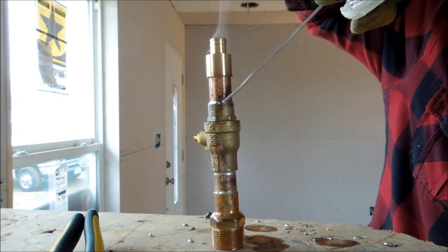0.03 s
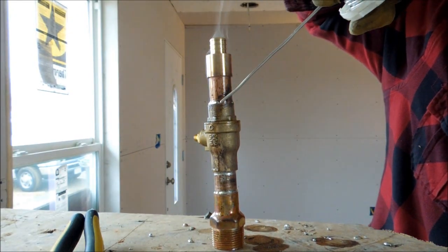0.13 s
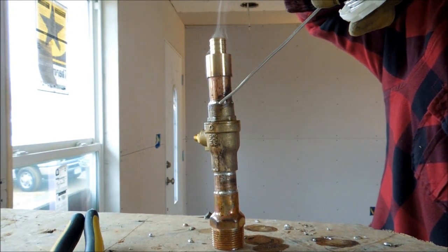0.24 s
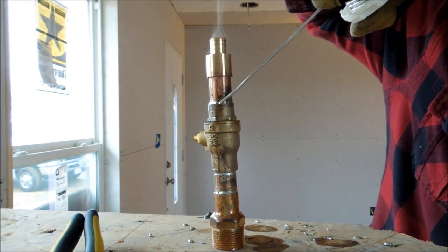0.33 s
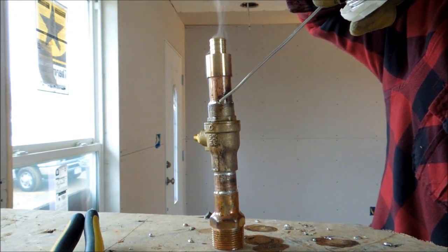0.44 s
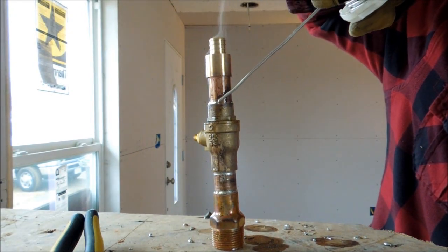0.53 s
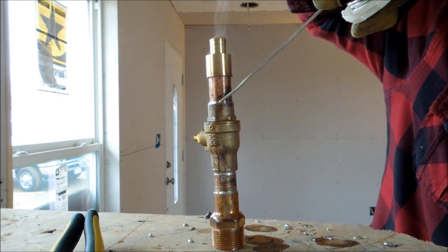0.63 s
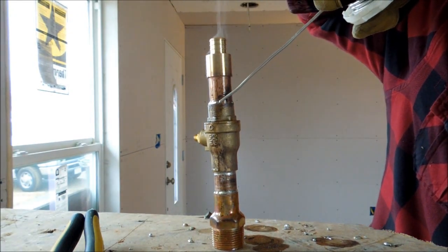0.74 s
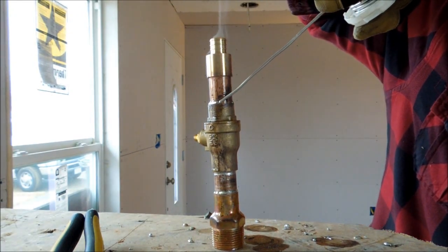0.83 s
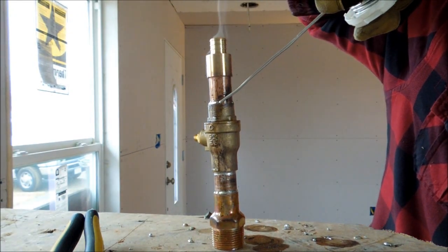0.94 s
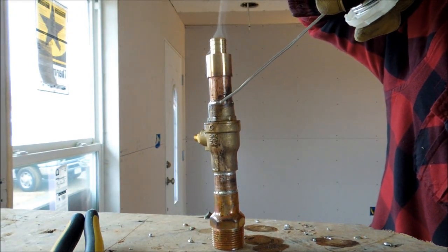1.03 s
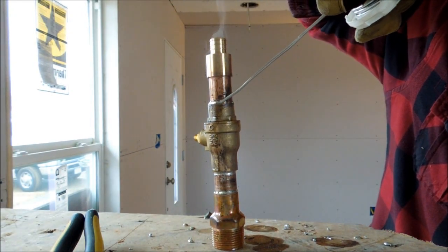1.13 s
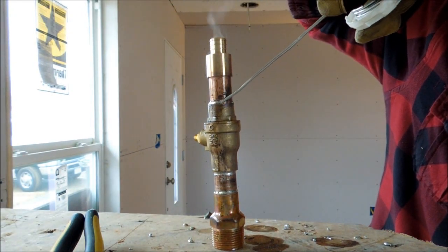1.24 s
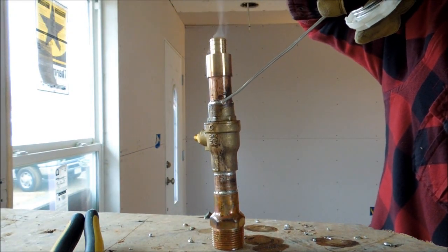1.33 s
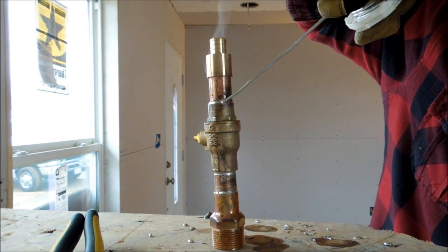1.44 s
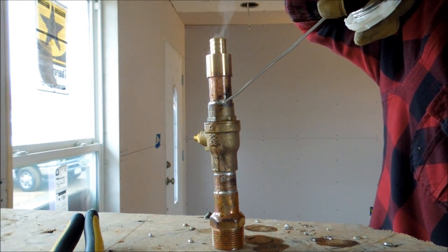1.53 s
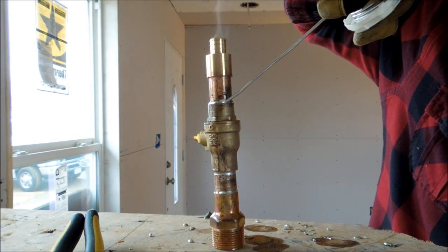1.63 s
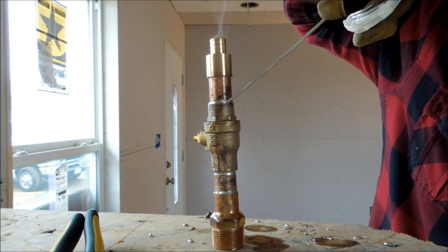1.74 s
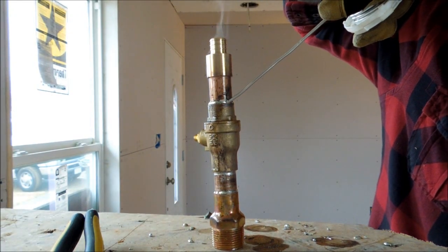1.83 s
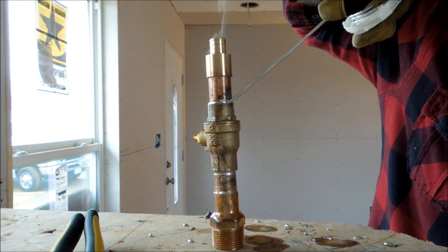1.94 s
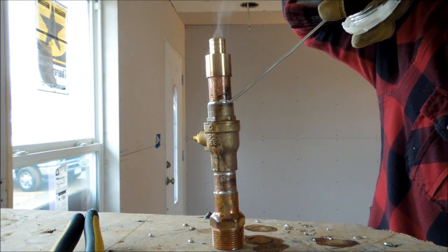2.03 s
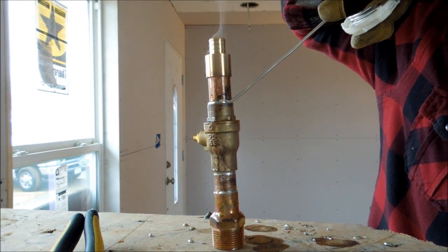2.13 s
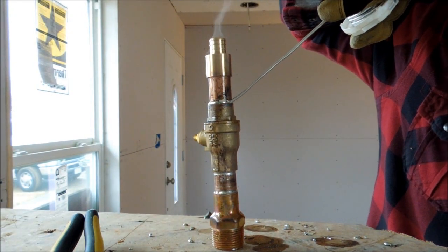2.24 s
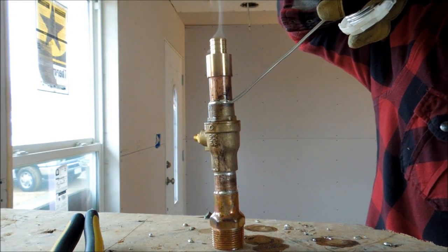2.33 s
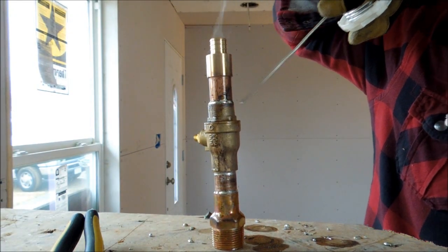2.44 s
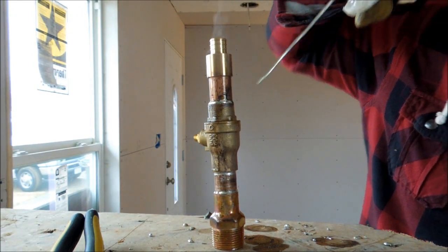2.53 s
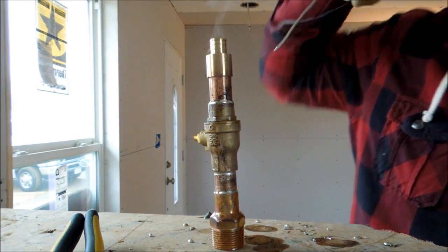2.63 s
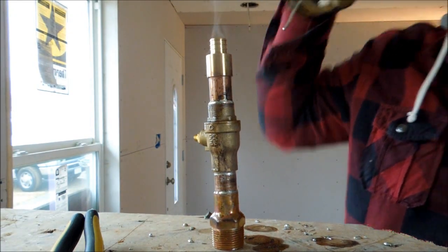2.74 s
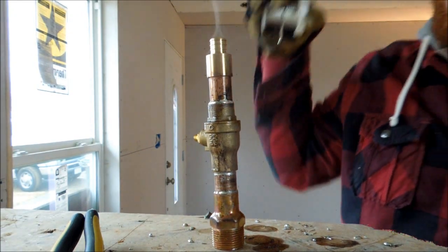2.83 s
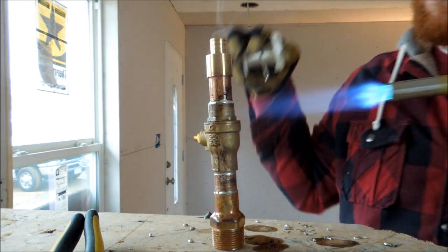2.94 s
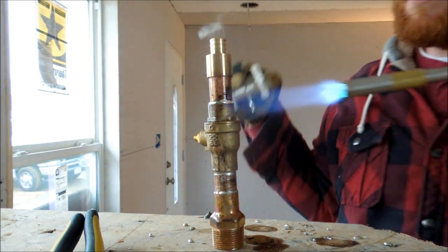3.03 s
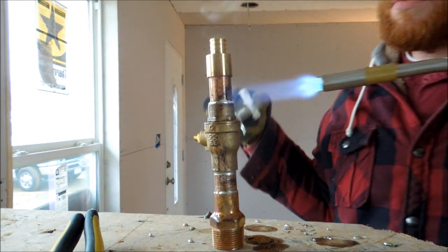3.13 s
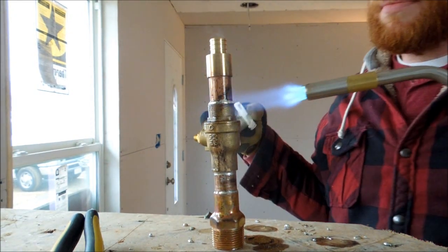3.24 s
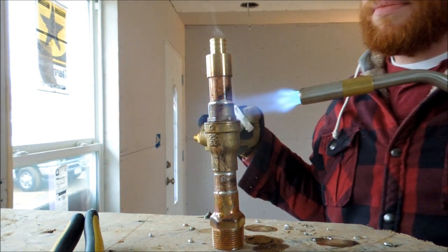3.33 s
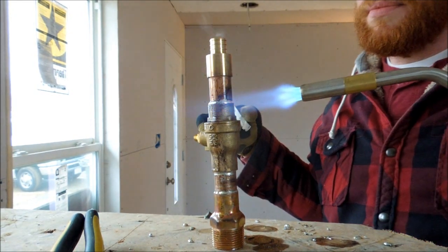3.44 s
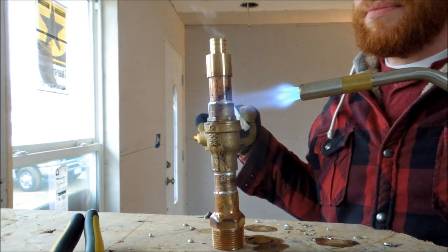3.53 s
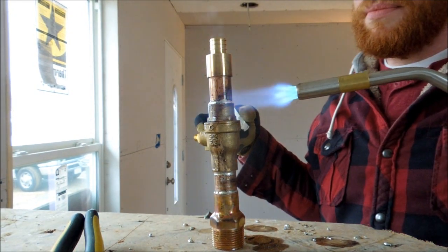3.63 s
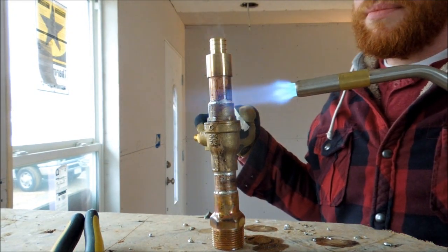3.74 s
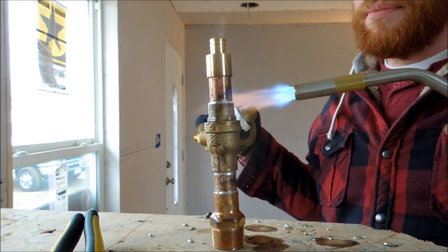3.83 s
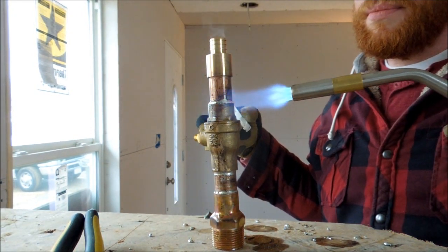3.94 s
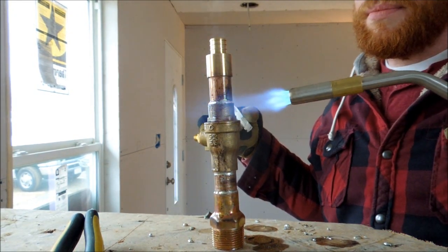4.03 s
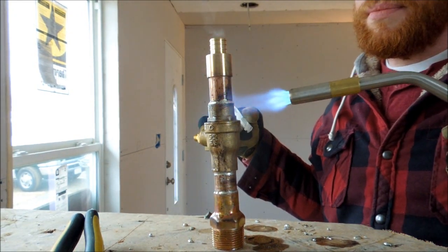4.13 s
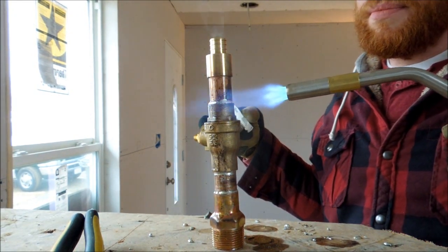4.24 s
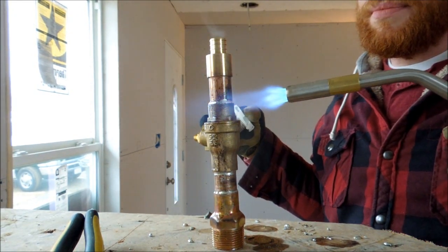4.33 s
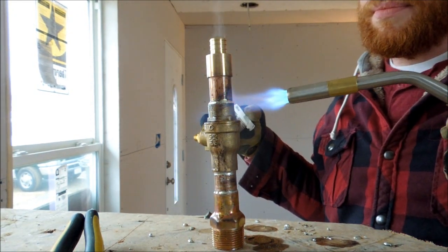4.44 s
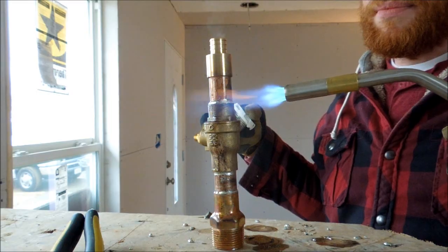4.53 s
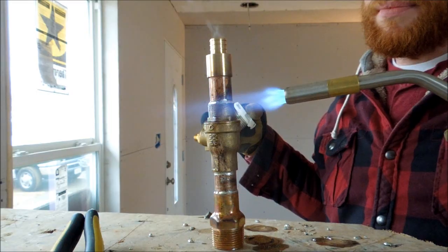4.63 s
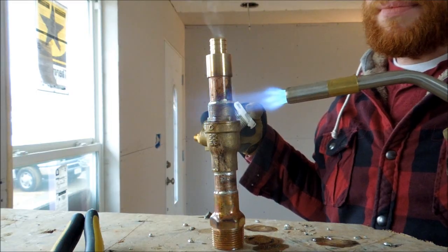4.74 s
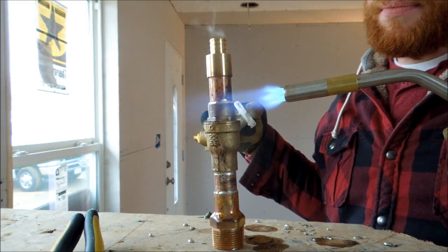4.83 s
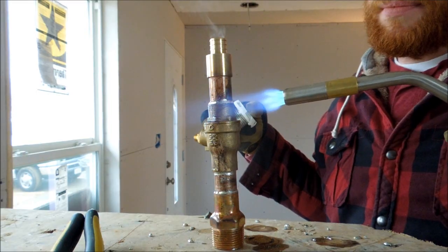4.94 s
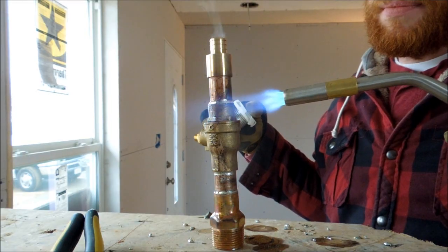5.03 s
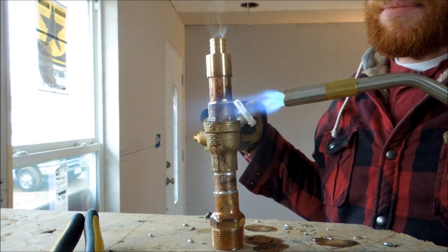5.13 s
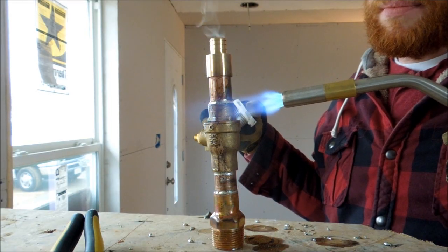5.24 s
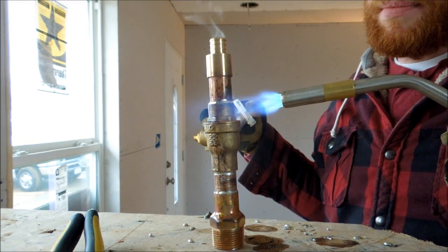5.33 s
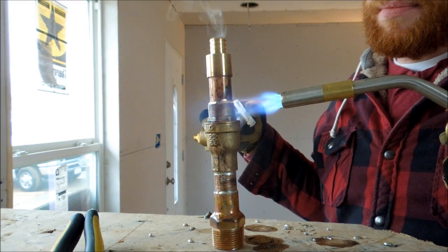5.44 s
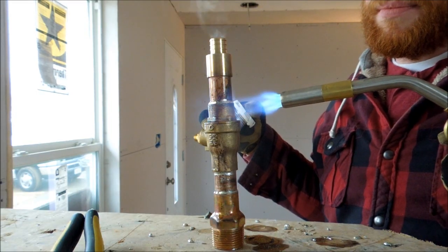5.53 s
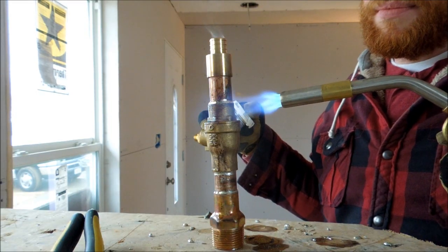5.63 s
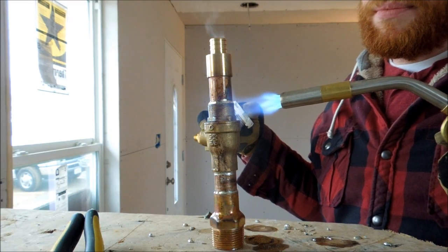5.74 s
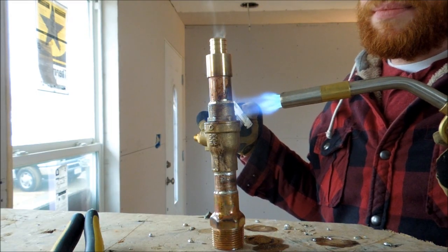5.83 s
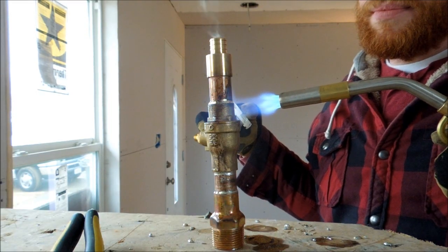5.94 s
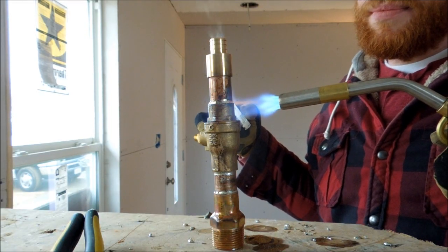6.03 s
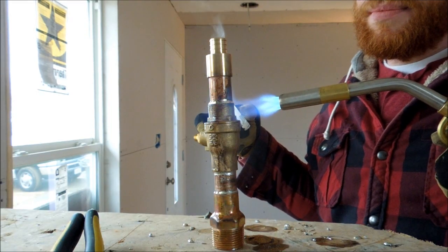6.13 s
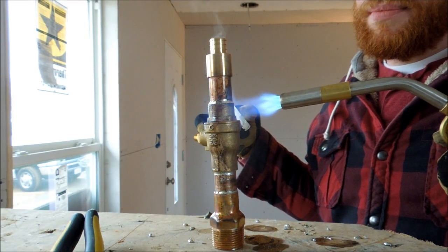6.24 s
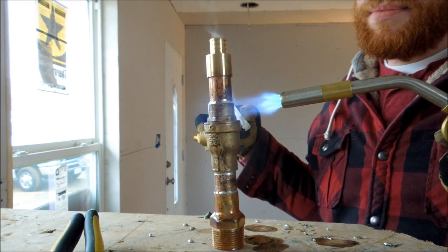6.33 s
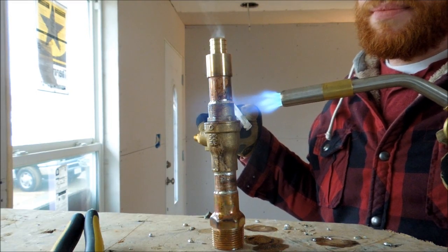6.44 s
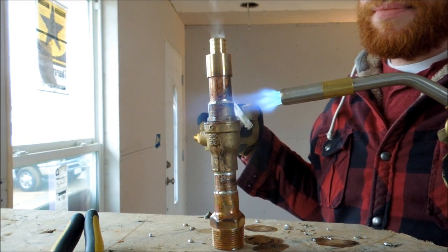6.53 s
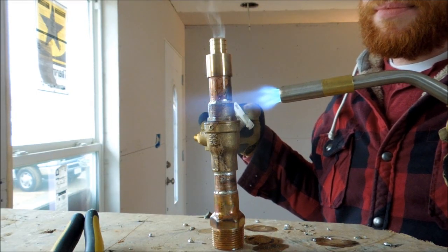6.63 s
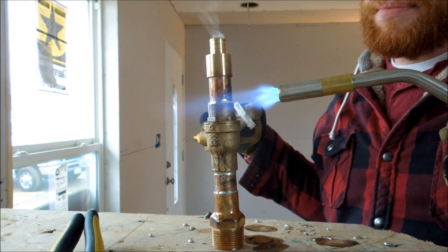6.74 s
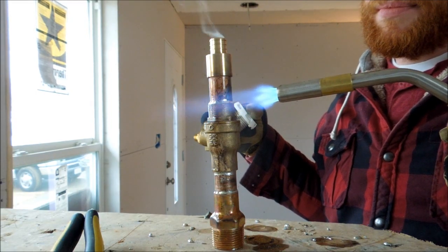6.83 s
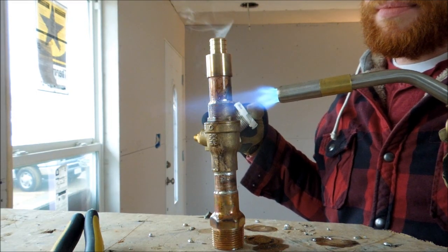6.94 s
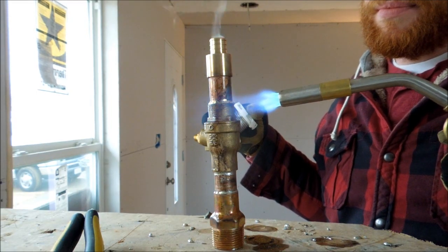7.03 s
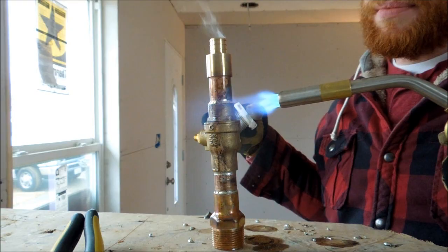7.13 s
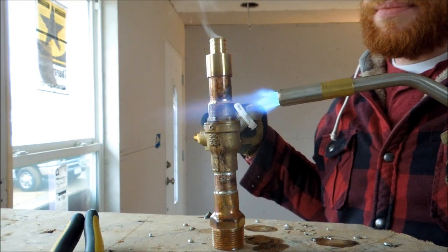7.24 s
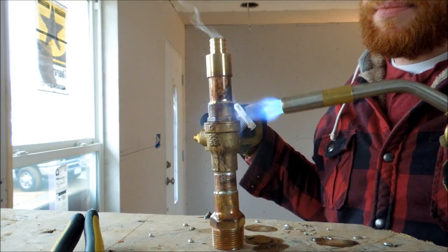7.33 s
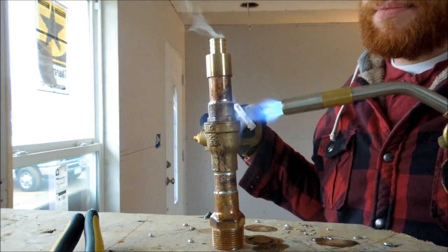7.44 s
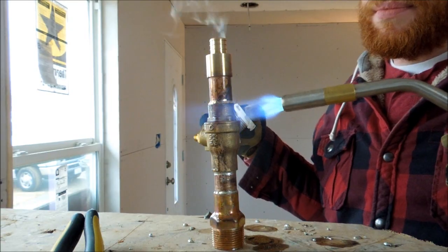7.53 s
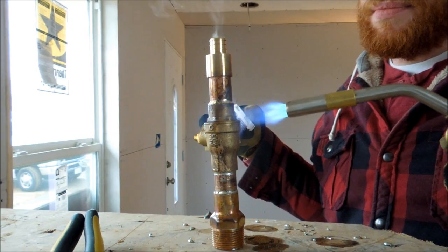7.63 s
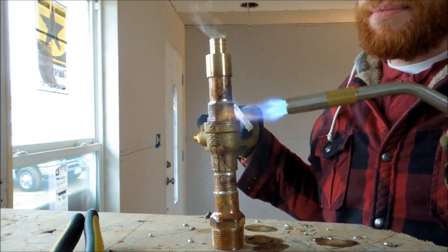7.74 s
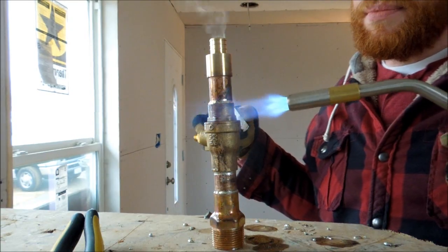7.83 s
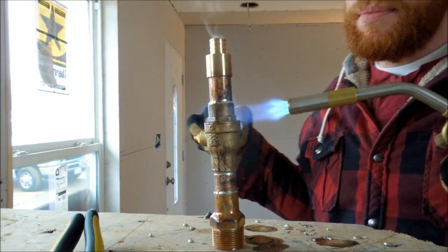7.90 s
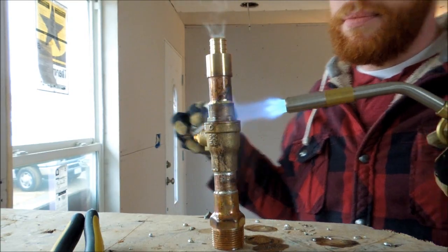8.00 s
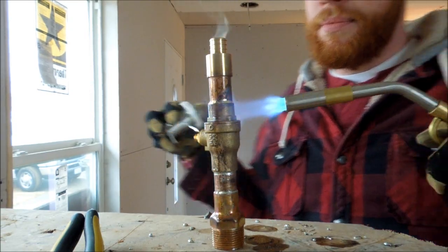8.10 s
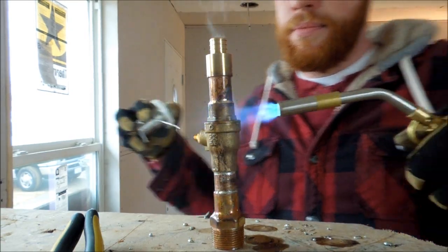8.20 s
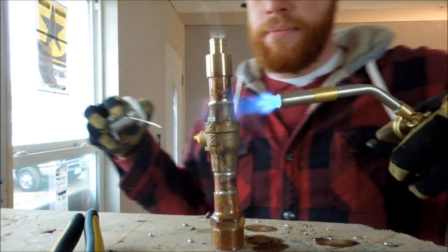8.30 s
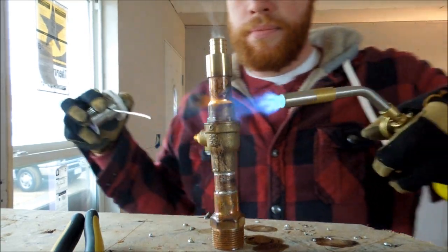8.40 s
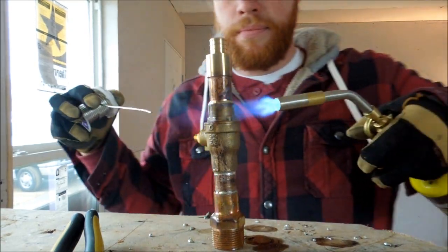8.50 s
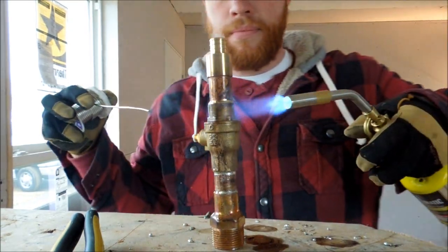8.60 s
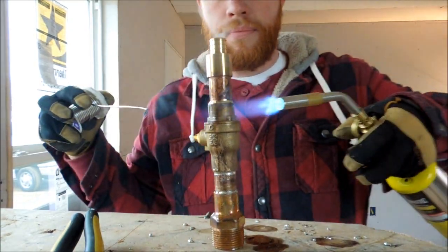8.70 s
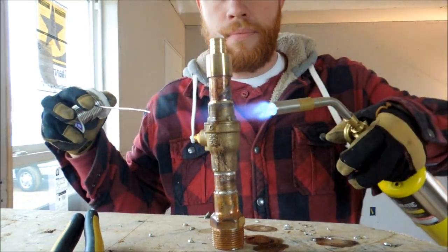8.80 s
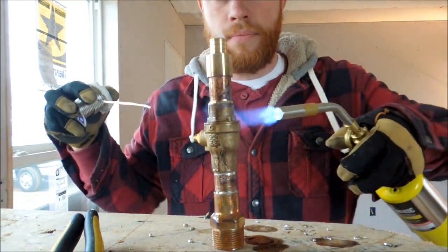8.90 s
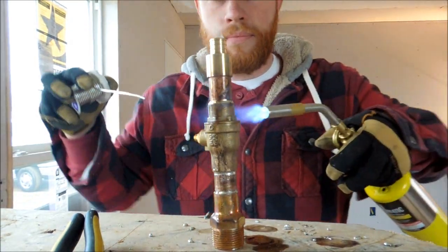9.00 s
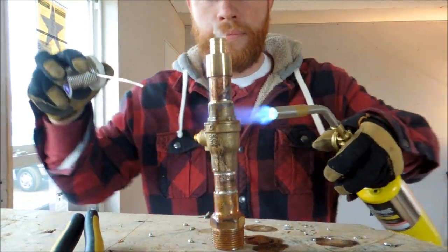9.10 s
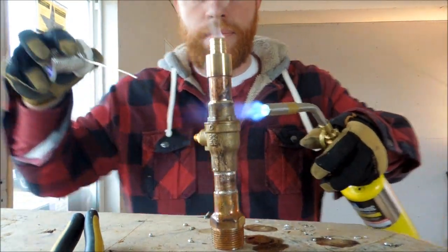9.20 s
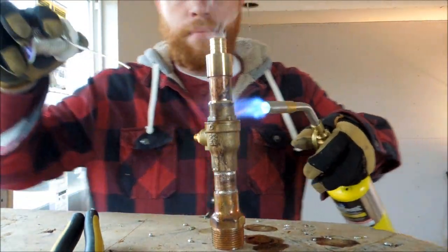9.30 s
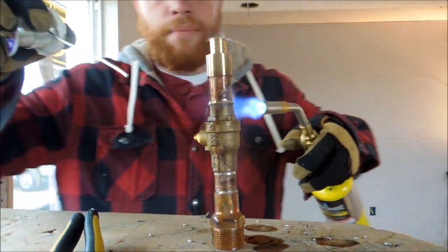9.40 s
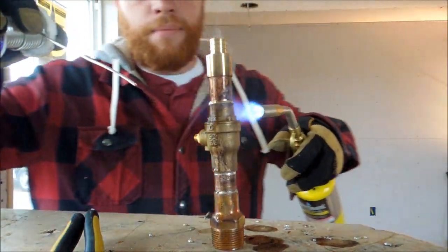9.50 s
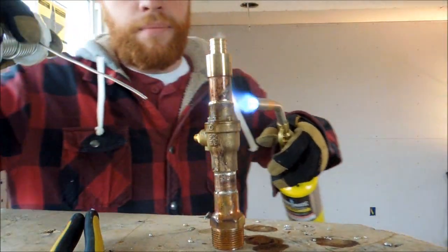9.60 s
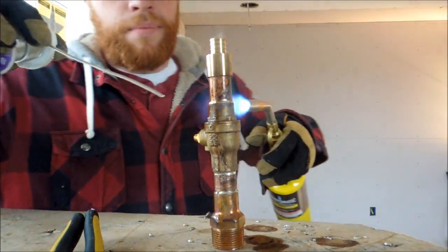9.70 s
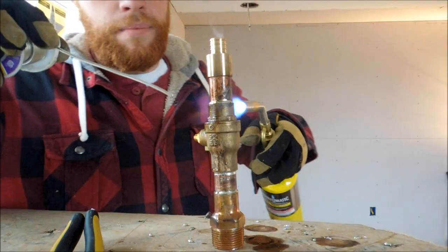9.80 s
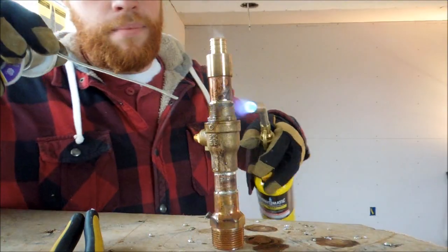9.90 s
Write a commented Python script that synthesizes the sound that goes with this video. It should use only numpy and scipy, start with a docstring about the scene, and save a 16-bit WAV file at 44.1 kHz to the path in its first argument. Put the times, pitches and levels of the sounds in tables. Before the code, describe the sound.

Flux sizzles and spits faintly on a hot pipe, then a gas torch hisses on, ignites with a whump and roars steadily.

```python
"""A workbench in a quiet room: flux sizzles and spits in a hot copper pipe joint, with small knocks.
A hand torch is opened, its gas hissing through a resonant tube; it lights with a crack and a whump.
It burns on with a loud roar that darkens as the torch swings behind the pipe. Coloured noise makes
room, gas and flame; bursts make the flux; damped sines make spits, knocks and whump."""
import sys
import numpy as np
from scipy import signal
from scipy.io import wavfile
from scipy.ndimage import uniform_filter1d

SR = 44100
rng = np.random.default_rng(int(sys.argv[2]) if len(sys.argv) > 2 else 0)


def int16_out(signal):
    """Quantize to a 16-bit WAV file."""
    q = np.round(np.clip(np.atleast_2d(signal).T, -1, 1) * 32767)
    wavfile.write(sys.argv[1], SR, q.astype(np.int16))


N = 439236

GAS_S, LIGHT_S = 2.929, 3.005  # the valve opens; the gas catches [s]
EDGE_HZ = 14210  # upper band limit
FRAME = 4096  # samples in a spectral frame
HOP = FRAME // 4
T = np.arange(N) / SR
HZ = np.fft.rfftfreq(FRAME, 1 / SR)
FRAME_S = np.arange(-(-N // HOP) + 1) * HOP / SR


def amp(db):
    """The decibel law: level to amplitude gain."""
    return 10 ** (np.asarray(db) / 20)


def evened(x):
    """Normalization to unit rms."""
    return x / np.sqrt(np.mean(x ** 2) + 1e-20)


def read(points, hz=HZ):
    """Interpolation of a spectrum on a logarithmic frequency axis."""
    f, value = np.transpose(points)
    return np.interp(np.log(hz + 1), np.log(f), value)


def follow(rows, t):
    """Linear interpolation of a table's columns at the times t."""
    s, *columns = np.transpose(rows)
    return [np.interp(t, s, c) for c in columns]


def band_level(db, lo, hi):
    """Power summation: level [dB] between lo and hi of unit noise coloured by db."""
    in_band = (HZ >= lo) & (HZ <= hi)
    return 10 * np.log10(np.mean(amp(db) ** 2 * in_band))


def add(mix, s, sound):
    """Linear superposition of a sound from time s."""
    part = mix[..., round(s * SR):][..., :sound.shape[-1]]
    part += sound[..., :part.shape[-1]]


def filtered(x, order, hz, kind):
    """Butterworth filtering: a maximally flat pass band."""
    return signal.sosfilt(signal.butter(order, hz, kind, fs=SR, output="sos"), x)


def wander(top_hz, count=24):
    """A sum of slow sines in random phase: an irregular curve of rms 1, one value per frame."""
    rates = np.geomspace(top_hz / 10, top_hz, count)
    sines = np.sin(2 * np.pi * (rates * FRAME_S[:, None] + rng.random(count)))
    return evened(sines.sum(1, keepdims=True))


def noise(db, likeness=None):
    """Partial coherence: noise coloured by db (bins, or frames x bins) at two microphones."""
    if likeness is None:
        # coherence of the microphone pair: (frequency [Hz], likeness [0-1])
        likeness = [(20, 0.85), (150, .99), (1000, 0.98), (2200, 1), (4500, 0.98), (6800, 0.96),
                    (7600, 0.89), (10000, 0.76), (11400, 0.86), (13000, .79), (14000, .58)]
    # level difference of the pair: (frequency [Hz], left minus right [dB])
    balance = [(30, 1.5), (130, -1.8), (650, -1.4), (1100, -0.4), (6800, -0.1), (7800, -0.8), (10500, -2.1),
               (13200, -1)]
    # phase difference of the pair: (frequency [Hz], phase by which left leads [rad])
    lead = [(7000, 0.011), (9500, 0.41), (14000, 0.27)]
    frames = dict(nperseg=FRAME, noverlap=FRAME - HOP)
    a, b = signal.stft(rng.standard_normal((2, N)), **frames)[2].transpose(0, 2, 1)
    same = np.clip(read(likeness), 0, 1)
    lean = amp(read(balance) / 2)
    right = (same * a + np.sqrt(1 - same ** 2) * b) * np.exp(-1j * read(lead))
    pair = np.array([a * lean, right / lean]) * amp(db)
    return signal.istft(pair.transpose(0, 2, 1), **frames)[1][:, :N]


def reflections(x, early_db, early_t60, late_db, late_t60):
    """Reverberation: decaying noise adds quick scatter off the bench and a longer room tail."""
    t = T[:SR // 2]
    early, late = amp(-60 * t / early_t60), amp(-60 * t / late_t60)
    early_part = amp(early_db) * early / np.linalg.norm(early)
    late_part = amp(late_db) * late / np.linalg.norm(late)
    scatter = noise(0)[:, SR:SR + len(t)]
    response = (early_part + late_part) * scatter
    return x + signal.oaconvolve(x[None], response, axes=1)[:, :N]


def room():
    """A diffuse field: faint hiss over a low rumble that swells and sinks."""
    # shape of the room noise: (frequency [Hz], relative density [dB per Hz])
    room_shape = [(12, -30), (20, 0), (42, 0), (60, -8), (122, -13), (217, -20), (302, -20), (346, -23),
                  (443, -24.5), (522, -26.5), (14000, -41.5)]
    # coherence of the diffuse field: (frequency [Hz], left-right likeness [0-1])
    room_likeness = [(60, 0.88), (180, 0.48), (530, 0.16), (1550, 0.15), (4600, 0.04), (13600, 0.02)]
    swell_db, swell_hz = 1.4, 4  # rms depth and fastest rate
    db = read(room_shape)
    low = 1 / (1 + (HZ / 260) ** 2)
    rumble_db = -52.3 + swell_db * wander(swell_hz) - band_level(db, 20, 200)
    hiss_db = -53 - band_level(db, 300, 14000)
    return noise(db + low * rumble_db + (1 - low) * hiss_db, room_likeness)


def flux(bubbles_per_s=6000):
    """Random impulses: tiny bubbles burst, swell a little, then drop to a faint steady simmer."""
    # level of the simmering flux: (time [s], level [dB])
    sizzle = [(0, -60), (.3, -57), (.62, -57.5), (.8, -67)]
    bursts = rng.standard_normal(N) * (rng.random(N) < bubbles_per_s / SR)
    fizz = filtered(bursts, 1, 1800, "high")
    return evened(fizz) * amp(follow(sizzle, T)[0])


def spits(spray_db=7, spray_s=0.0011):
    """Impulsive excitation: drops of boiling flux burst and ring the modes of the pipe."""
    # spits of flux: (time [s], level applied to ring and spray [dB])
    spit_times = [(0.225, -28), (0.4164, -44), (.5173, -25), (0.723, -52)]
    # modes of the pipe: (frequency [Hz], relative level [dB], t60 [s])
    pipe_modes = [(1630, -11.5, 0.017), (2930, -5.5, 0.0096), (3500, -10, .007), (5170, -7, .007),
                  (5930, -1, 0.0062), (8300, -10, .005), (10500, -10, .005), (11700, -2, 0.0054)]
    out, t = np.zeros(N), T[:SR // 10]
    for s, db in spit_times:
        ring = 0
        for hz, level, t60 in pipe_modes:
            ring = ring + amp(level - 60 * t / t60) * np.sin(2 * np.pi * (hz * t + rng.random()))
        spray = amp(spray_db) * rng.standard_normal(len(t)) * np.exp(-(t / spray_s) ** 2)
        spray = filtered(spray, 2, 8500, "high")
        onset = 1 - np.exp(-t / 0.00036)
        add(out, s, amp(db) * (ring + spray) * onset)
    return reflections(out, early_db=-6, early_t60=0.043, late_db=-9, late_t60=0.38)


def handling():
    """Damped free vibration: small knocks as the hands move."""
    # knocks: (time [s], initial level [dB], frequency [Hz], t60 [s])
    knocks = [(0.723, -47, 200, 0.16), (.724, -52, 338, .12), (2.805, -46, 3400, .02)]
    out, t = np.zeros(N), T[:SR // 4]
    for s, db, hz, t60 in knocks:
        add(out, s, amp(db - 60 * t / t60) * np.sin(2 * np.pi * hz * t))
    return reflections(out, early_db=-12, early_t60=.05, late_db=-12, late_t60=.3)


def gas(tube_hz=995, bounce=.52, rise_s=0.03, level_db=-21.5):
    """Tube resonance: flow noise is reinforced at multiples of the tube's round-trip rate."""
    # shape of the unlit gas noise: (frequency [Hz], relative density [dB per Hz])
    gas_shape = [(100, -26), (600, -19), (1000, -13.5), (1400, -19), (2000, -7), (2600, -13), (3700, -15),
                 (5000, -4.5), (8000, -3), (12400, 0), (14000, -9)]
    echo = bounce / (1 + (HZ / 11000) ** 2) * np.exp(-2j * np.pi * HZ / tube_hz)
    db = read(gas_shape) - 20 * np.log10(abs(1 - echo))
    valve = np.clip((T - GAS_S) / rise_s, 0, 1) ** 1.5
    unlit = np.exp(-np.maximum(T - LIGHT_S, 0) / 0.098)
    return noise(db - band_level(db, 200, EDGE_HZ) + level_db) * valve * unlit


def ignition(crack_db=-5, crack_s=0.006, whump_delay_s=0.00262):
    """Impulsive expansion: the flame front cracks down the tube, then the gas outside whumps."""
    # modes of the air as the gas catches: (frequency [Hz], level before onset [dB], t60 [s])
    air_modes = [(241, 9, .03), (195, 0.5, 0.11), (130, -9, 0.064), (60, -18, .1), (345, -9.5, 0.14),
                 (586, -15, 0.12), (831, -9.5, 0.15)]
    out, t = np.zeros(N), T[:SR // 3]
    crack = evened(filtered(rng.standard_normal(len(t)), 1, 3500, "high"))
    add(out, LIGHT_S, amp(crack_db) * crack * np.exp(-(t / crack_s) ** 2))
    whump = -sum(amp(db - 60 * t / t60) * np.sin(2 * np.pi * hz * t) for hz, db, t60 in air_modes)
    onset = 1 - np.exp(-t / 0.0012)
    add(out, LIGHT_S + whump_delay_s, whump * onset)
    return reflections(out, early_db=-10, early_t60=0.055, late_db=-11, late_t60=.25)


def comb_db(angle):
    """Comb interference: delayed copies stripe the flame's spectrum as the hand turns and wobbles."""
    # surfaces round the flame: (unshifted delay [ms], strength before filtering, negative = inverted)
    surface_echoes = [(1.37, .09), (1.875, -0.063), (3.47, 0.1), (4.82, -0.17), (5.815, 0.14),
                      (6.615, 0.09), (7.92, -.07)]
    wobble_ms, wobble_hz = .015, 1.2  # unsteady hand: rms shift, fastest rate
    sooner_ms_per_deg, working_deg = .0026, 8  # far echoes come sooner as the torch turns
    ceiling_ms, ceiling_gain = 4.985, .215  # before shift and treble loss
    # short-delay colouring that hollows out the flame's built-in treble stripes as the torch turns
    hollow_ms, hollow_gain, hollow_deg = .436, .29, 32
    glove_ms, glove_gain, glove_shift_ms, glove_hz = .75, .11, .09, 1  # mean delay; rms shift, rate
    phase_per_ms = -2j * np.pi * HZ / 1000

    shift_ms = wobble_ms * wander(wobble_hz) - sooner_ms_per_deg * (angle - working_deg)
    surfaces = sum(gain * np.exp(phase_per_ms * ms) for ms, gain in surface_echoes)
    surfaces = surfaces * HZ / (HZ + 600)
    ceiling = ceiling_gain * np.exp(phase_per_ms * ceiling_ms)
    treble_loss = 1 + (HZ / 11000) ** 2  # the top scatters away
    far = (surfaces + ceiling) * np.exp(phase_per_ms * shift_ms) / treble_loss

    turned = 1 - np.exp(-(angle / hollow_deg) ** 2)
    hollow = -hollow_gain * turned * HZ / (HZ + 2400) * np.exp(phase_per_ms * hollow_ms)
    glove_delay_ms = glove_ms + glove_shift_ms * wander(glove_hz)
    glove = glove_gain * HZ / (HZ + 2500) * np.exp(phase_per_ms * glove_delay_ms)
    return 20 * np.log10(abs(1 + far + hollow + glove))


def flame(flutter_db=0.56, flare_db=5.2, flare_s=.145, gust_db=.6, gust_hz=6):
    """Turbulent combustion: a low roar, a gusty rush round the pipe and the jet's directional hiss."""
    # shape of the flame noise: (frequency [Hz], relative density [dB per Hz])
    flame_shape = [(20, -38), (60, -21), (110, -8), (200, -8.5), (420, -3.5), (650, -5.5), (1050, -12),
                   (2250, -3), (3700, -13), (4600, -9), (5850, -15), (8000, -14.5), (11400, -9.5),
                   (13000, -11), (14200, -15)]
    # burner and space round the bench: (frequency [Hz], two standard deviations [Hz], lift [dB])
    resonances = [(134, 22, 7.5), (204.7, 20.5, 12.5), (247, 33, 10.5), (330, 77, 6.5), (391, 31, -7.5),
                  (569, 21, 8), (692, 78, 7.5), (857, 41, 6.5), (917, 37, 11), (1155, 22.6, 10),
                  (1190, 15, 3), (1362, 40, 7.5), (1660, 11, 4.5), (2014, 28, 4.5), (2407, 30, 2.5),
                  (2580, 39.6, -5), (2590, 76, 5.5), (2890, 31, 5.5), (3444, 37, 4.5), (4540, 77, 2.5),
                  (5760, 260, -4), (7350, 330, 2.5), (11300, 500, 3), (12500, 260, 3)]
    # the hand turns the torch from side-on to behind the pipe: (time [s], angle [degrees])
    torch_angle = [(3.25, 1), (4.0, 15), (4.2, 4), (5.4, 3), (6.8, 13), (7.95, 11), (8.3, 30), (8.53, 46),
                   (8.8, 77), (8.96, 59), (9.11, 72), (9.25, 61), (9.5, 84), (9.8, 90), (9.92, 84)]
    # how squarely the flame strikes the pipe: (time [s], contact [0-1])
    pipe_contact = [(3.3, .05), (3.6, .62), (4.2, .08), (5.3, .06), (5.7, .28), (6.2, .46), (7.05, .14),
                    (7.3, .6), (7.5, .18), (8.6, .33), (8.9, .5), (9.3, .45), (9.5, .96), (9.77, .9),
                    (9.92, .35)]
    beam_deg, beam_loss = 27, .0025  # hiss is loudest here; loss [dB per degree squared]
    rush_hz, rush_drop_hz = 680, 70  # centre without contact, drop at full contact
    blur_deg = 88  # here the resonances are halfway to their smoothed spectrum

    angle = follow(torch_angle, FRAME_S[:, None])[0]
    contact = follow(pipe_contact, FRAME_S[:, None])[0]
    roar_db = -25.3 + 1.5 * contact
    rush_db = -24.6 + 8 * contact + gust_db * wander(gust_hz)
    hiss_db = -20.2 - beam_loss * (angle - beam_deg) ** 2
    lift_db = sum(db * np.exp(-2 * ((HZ - hz) / width) ** 2) for hz, width, db in resonances)
    steady_db = read(flame_shape) + lift_db

    # each part rules its own range of pitch; the rush deepens as the flame wraps the pipe
    rush = np.exp(-(np.log((HZ + 1) / (rush_hz - rush_drop_hz * contact)) / 0.43) ** 2)
    hiss = np.clip(np.log((HZ + 1) / 800) / np.log(4200 / 800), 0, 1)
    db = steady_db + (1 - rush) * (1 - hiss) * (roar_db - band_level(steady_db, 100, 450))
    db = db + rush * (1 - hiss) * (rush_db - band_level(steady_db, 500, 800))
    db += hiss * (hiss_db - band_level(steady_db, 4000, 14000))
    # the resonances blur as the torch swings away
    db -= .5 * (angle / blur_deg) ** 2 * (lift_db - uniform_filter1d(lift_db, size=25))

    # the flame flares as it catches, with a slight flutter throughout
    age = np.maximum(T - LIGHT_S, 0)
    flutter = evened(filtered(rng.standard_normal(N), 2, 25, "low"))
    onset = 1 - np.exp(-age / 0.0054)
    swell_db = flare_db * np.exp(-(age / flare_s) ** 2) + flutter_db * flutter
    return noise(db + comb_db(angle)) * onset * amp(swell_db)


def scene():
    """Superposition: the joint simmers, then the torch is opened, lit and held on it."""
    return room() + flux() + spits() + handling() + gas() + ignition() + flame()


def record(dry):
    """Saturation and band limiting: the whump overloads the input, then the top is cut."""
    clipped = dry / (1 + abs(dry) ** 6) ** (1 / 6)
    lowpass = signal.firwin(1023, EDGE_HZ, window=("kaiser", 8), fs=SR)
    return signal.oaconvolve(clipped, lowpass[None], "same")


dry = scene()
out = record(dry)
int16_out(out)
```